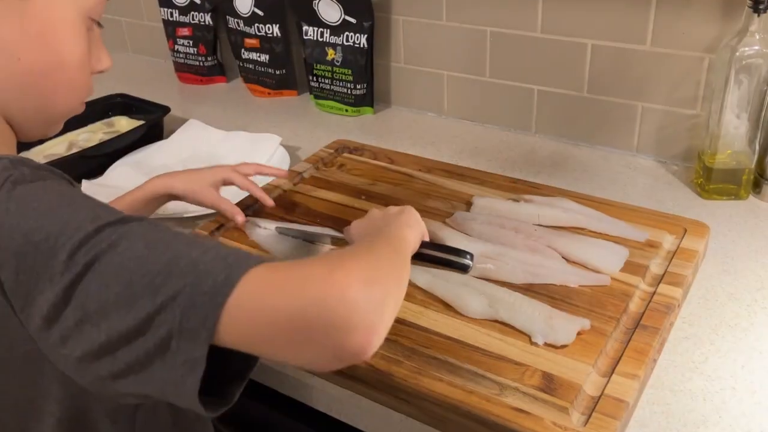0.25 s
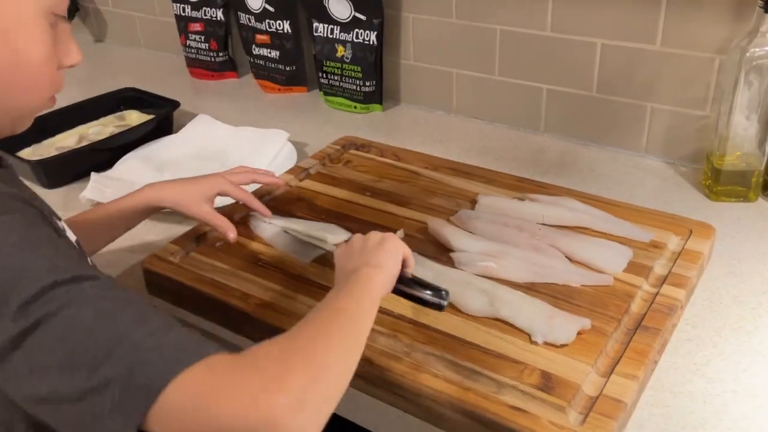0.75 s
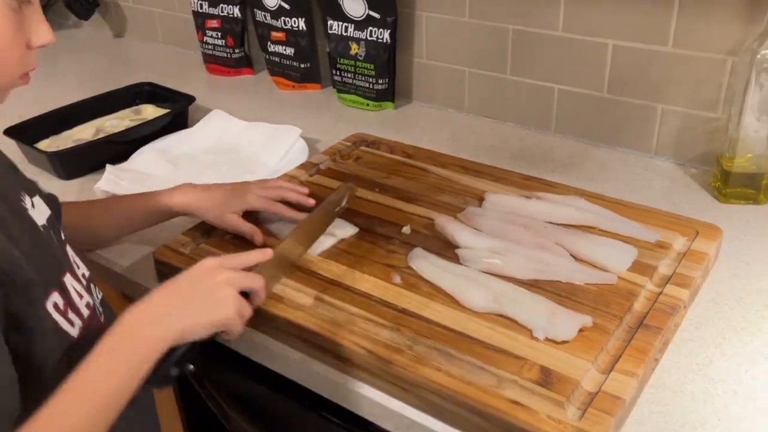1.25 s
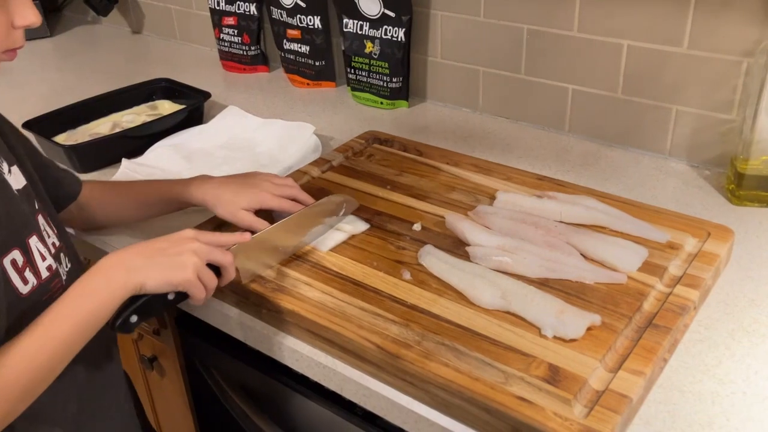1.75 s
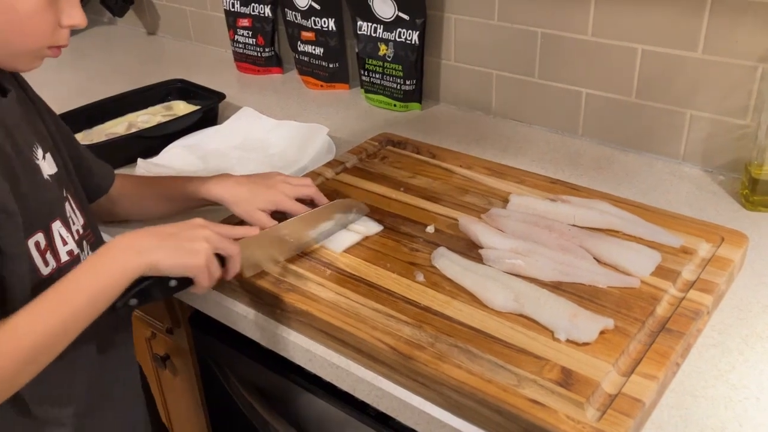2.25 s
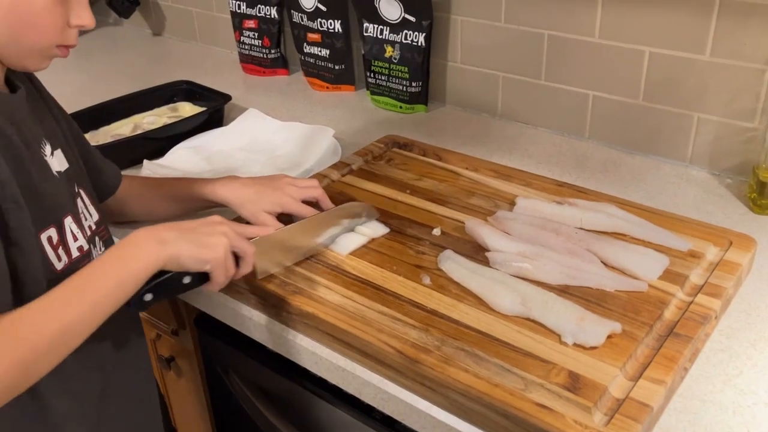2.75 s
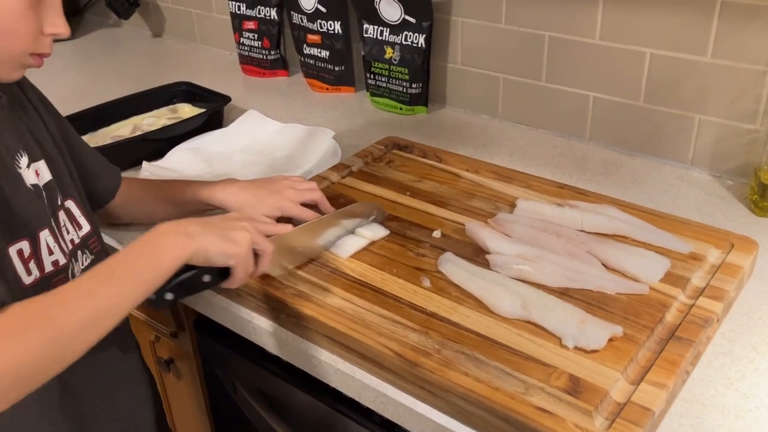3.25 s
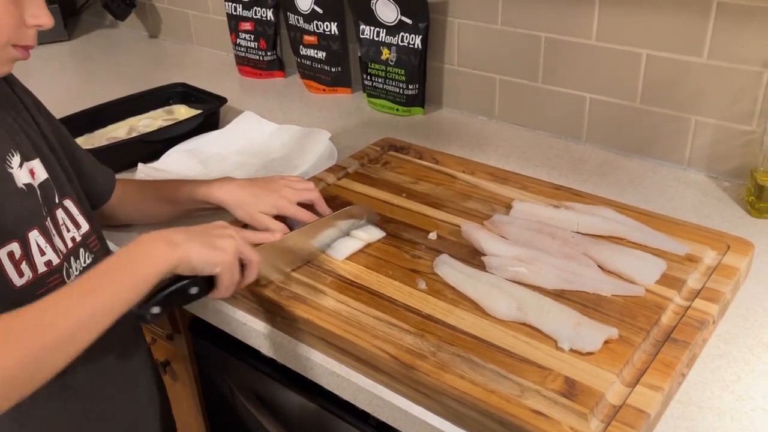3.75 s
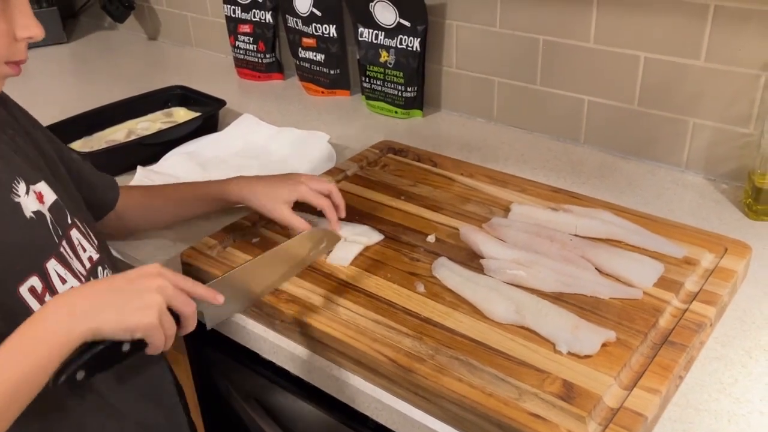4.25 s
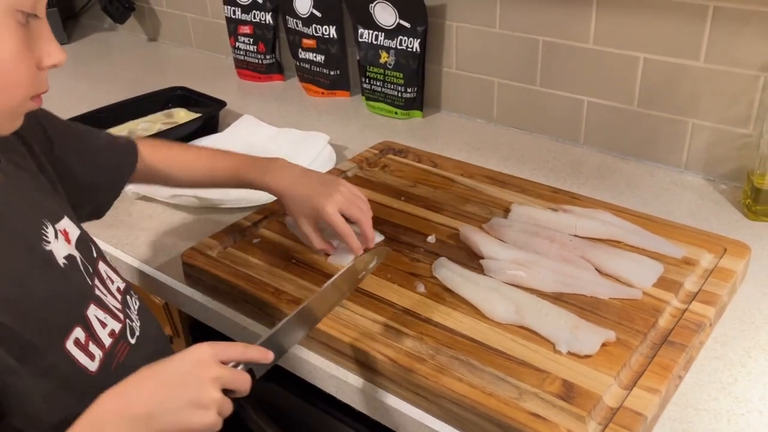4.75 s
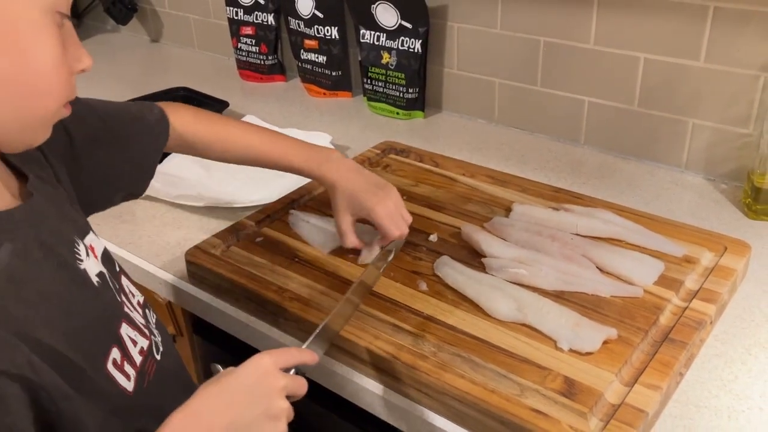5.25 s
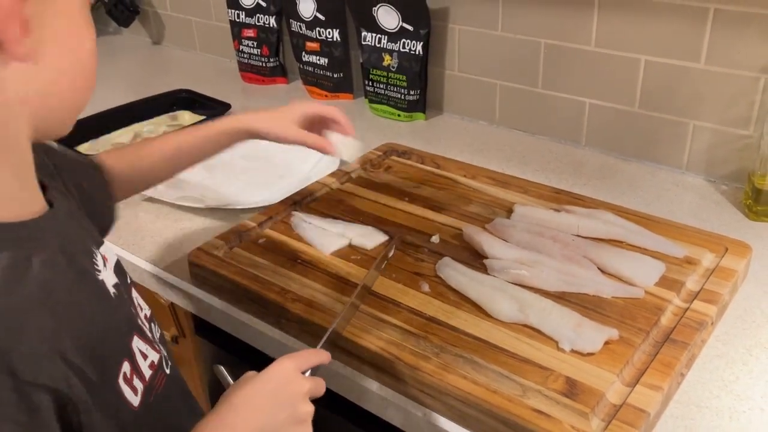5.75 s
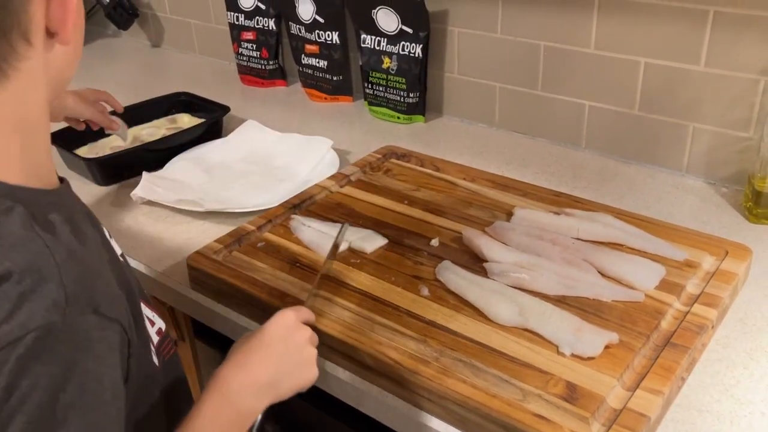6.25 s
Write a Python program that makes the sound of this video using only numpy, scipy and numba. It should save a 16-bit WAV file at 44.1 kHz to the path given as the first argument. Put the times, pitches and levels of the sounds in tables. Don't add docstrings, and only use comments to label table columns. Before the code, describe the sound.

Short faint blade rasps, then a denser run of scraping cuts, blade taps and a tiny wet peel, above a low muffled engine drone.

```python
import sys
import numpy as np
from scipy import signal
from scipy.fft import rfft, irfft
from scipy.io import wavfile
from scipy.ndimage import uniform_filter1d
from numba import njit

SR = 44100
rng = np.random.default_rng(int(sys.argv[2]) if len(sys.argv) > 2 else 0)


def volts(x):
    e = np.asarray(x, float) / 20
    return 10 ** e


def master(y):
    cut = np.clip(np.atleast_2d(y).T, -1, 1)
    pcm = np.round(cut * 32767)
    wavfile.write(sys.argv[1], SR, pcm.astype(np.int16))


N = 287532
T = np.arange(N) / SR
JOIN_HZ = 6400


# start of full pressure, attack, hold and release in seconds, board level in dB.
STROKES = [(0, .05, 0.0067, 0.12, -69), (0.156, 0.18, 0.1, 0.067, -74.5), (0.412, .09, 0.068, 0.12, -78.5),
           (0.701, 0.15, 0.056, 0.11, -72), (0.9, 0.06, 0.048, 0.17, -67), (1.108, 0.11, .11, 0.077, -77.5),
           (1.606, 0.22, 0.066, 0.18, -83), (2.403, 0.11, 0.077, 0.11, -81),
           (2.667, 0.081, 0.021, 0.1, -80.5), (2.902, 0.13, 0.019, 0.12, -63.5),
           (3.115, 0.085, 0.045, 0.12, -64.5), (3.29, 0.094, 0.099, 0.11, -63),
           (3.498, 0.028, .14, 0.11, -64.5), (3.711, 0.016, .08, .15, -66),
           (3.84, 0.22, 0.045, 0.12, -61.5), (4.047, 0.11, 0.12, 0.12, -66.5),
           (4.154, .06, 0.041, 0.096, -70), (4.331, .001, 0.017, 0.11, -69.5),
           (6.489, 0.0093, 0.036, .05, -84.5)]
# share of free ringing (0-1), bending of the blade's notes in percent,
# board thud and blade level in dB over the board, blade tilt in dB per band.
GRIPS = [(0.54, 1, 18.5, -0.5, -8), (0.58, 2.5, 14.5, 5.5, -4), (0.52, 3, 22.5, 5.5, -2.5),
         (0.86, 1.5, 12.5, 5, -4.5), (0.51, 2, 4, 4, -9), (0.24, 3, 13.5, 4.5, -8),
         (0.46, 3, 19, -11.5, 3.5), (0.57, -3, 7, -17, 2), (0.76, 0, 17.5, 8, -8.5),
         (0.35, -2.5, 4.5, 1.5, -6.5), (0.33, 0.4, 5.5, 3, -7), (0.25, -1.6, -0.5, 0.5, -3.5),
         (0.21, 0.5, 0.5, 3.5, -3.5), (0.14, -2, -2.5, 5, -7.5), (0.2, -0.1, 4, 0, -4),
         (0.11, -1.3, -1.5, 5.5, -3), (0.26, -0.5, 0, 7, -4.5), (0.042, -6.5, -16, 13.5, -13),
         (0.044, -9.5, -21, 9, -6.5)]
KNIFE_BANDS_HZ = [690, 2400, 6600, 11400, 13600, 19000]
# frequency in Hz, likeness (-1 to 1).
KNIFE_ALIKE = [(300, 0.91), (1100, 0.44), (1700, -0.43), (2400, 0.14), (2750, -0.66), (3100, 0.0042),
               (3700, 0.13), (5100, -0.37), (6300, -0.54)]


def knife():
    pressure_db = [db + swell(*shape, edge_db=22, curve=1.074) for *shape, db in STROKES]
    board_db, free, bend, thud_db, blade_db, tilt_db = loudest(pressure_db, np.transpose(GRIPS))
    free = np.clip(free, .05, .95)
    fibres_db = 1.33 * np.repeat(rng.exponential(size=N // 24 + 1), 24)[:N]
    catches = volts(fibres_db + 1.94 * walk(45))
    slips = unit(rng.standard_normal((2, N)) * catches)
    rasp = unit(rng.standard_normal((2, N)) * catches)

    ringing = blade_ring(slips, bend)
    damped = flesh_hiss(rasp)
    band_db = (0,
               blade_db - 3.0,
               blade_db + tilt_db + 5.5,
               blade_db + 2 * tilt_db + 0.5,
               blade_db + 1.8 * tilt_db + 4.5 - 6 * free)
    out = volts(thud_db) * board_thud()
    for low_hz, high_hz, db in zip(KNIFE_BANDS_HZ, KNIFE_BANDS_HZ[1:], band_db):
        ringing_part = np.sqrt(free) * unit(band(ringing, low_hz, high_hz))
        damped_part = np.sqrt(1 - free) * unit(band(damped, low_hz, high_hz))
        out = out + volts(db) * (ringing_part + damped_part)

    low_db, high_db = bites()
    out = volts(low_db) * band(out, 1, JOIN_HZ) + volts(high_db) * band(out, JOIN_HZ, 21000)
    out = out * volts(board_db) + singing(slips)
    return spread(out, KNIFE_ALIKE) * volts(np.array([[.5], [-.5]]))


# frequency in Hz, width in Hz, level in dB.
BLADE = [(1040, 45, -1), (2080, 580, -3), (2543, 76, -3.5), (3320, 300, 6), (3940, 160, 2.5),
         (4470, 330, 1.5), (5150, 31, -8), (6180, 90, 1), (7380, 40, -0.5), (8480, 330, 9.5),
         (6900, 300, -1.5), (10450, 110, 2), (10030, 970, 4), (11500, 73, 1.5), (12290, 230, 3),
         (2800, 280, -3.5), (13600, 440, 4), (14600, 180, 0), (15100, 770, 6)]


def blade_ring(slips, bend):
    struck = 0
    for k, (hz, width, db) in enumerate(BLADE):
        level = (-1) ** k * volts(db + 2 * walk(18)) / np.sqrt(width)
        struck = struck + level * ring(slips, hz * (1 + bend / 100), width)
    return sum(ring(struck, hz * (1 + bend / 100), 3 * width) for hz, width, _ in BLADE)


def flesh_hiss(rasp):
    out = .4 * rasp
    for hz in np.arange(750, 16300, 380.):
        out = out + volts(5.5 * walk(24) - 6) * ring(rasp, hz + 90 * rng.standard_normal(), 170)
    return out


# frequency in Hz, width in Hz, level in dB.
BOARD = [(162.7, 15.3, 1), (279, 11, -2), (358, 43, -2), (528, 33, -11.5)]


def board_thud():
    return unit(sum(volts(db) * ring(rng.standard_normal((2, N)), hz, width) for hz, width, db in BOARD))


# middle in seconds, level in dB, frequency in
# Hz, length in seconds.
SINGS = [(0.218, -76, 1080, 0.054), (0.447, -77.5, 3940, 0.17), (0.751, -68, 3620, 0.11),
         (0.938, -65.5, 11500, 0.09), (0.955, -69, 4270, 0.1), (0.959, -67.5, 7080, 0.069),
         (0.972, -76, 2500, 0.027), (2.392, -77, 1204, 0.083), (2.466, -84, 3480, .06),
         (2.847, -74, 3520, 0.049), (3.088, -70, 3670, 0.041), (4.026, -72.5, 3480, 0.064),
         (2.912, -59.5, 8240, 0.035), (3.143, -68.5, 1040, 0.059), (3.288, -64.5, 2880, 0.053),
         (3.345, -64, 1034, 0.058), (3.539, -61, 1040, 0.071), (3.57, -65, 1950, 0.063),
         (3.72, -67, 4700, 0.03), (3.872, -56, 8400, 0.04), (3.865, -57, 12900, 0.049),
         (4.063, -57.5, 11540, 0.029), (4.073, -65.5, 4270, 0.033), (4.197, -69, 9910, .045),
         (4.174, -69, 14700, .05), (4.2, -66, 6300, 0.086), (4.198, -65, 7320, 0.049),
         (4.218, -68, 8300, 0.052), (4.387, -72, 4950, 0.1), (4.37, -76, 5560, .05),
         (4.367, -79, 10700, .06), (4.385, -76, 3800, 0.075), (3.02, -82, 10700, .1),
         (3.45, -84, 10700, .12), (4.238, -75, 10700, .1), (4.1, -72, 3450, .12), (4.2, -67, 10000, .07),
         (0.212, -74, 4300, 0.087), (.2, -85, 7390, .12), (0.427, -73, 6370, 0.11),
         (3.346, -64.5, 900, .08), (3.83, -65.5, 940, 0.14), (3.143, -77, 1960, .05),
         (4.098, -78, 4000, .1),
         (0.139, -75, 9130, 0.05), (0.418, -76, 4010, 0.05), (0.726, -72, 10680, 0.05),
          (0.749, -78, 2760, 0.05), (0.896, -68, 10720, 0.05), (0.913, -73, 11800, 0.05),
          (0.92, -82, 3270, 0.045), (0.943, -68, 9910, 0.05), (0.942, -71, 1290, 0.065),
          (0.94, -76, 6120, 0.05), (0.958, -72, 3960, 0.04), (0.958, -65.5, 8480, 0.05),
          (0.958, -78, 1940, 0.05), (0.964, -73, 2630, 0.042), (3.143, -74, 3960, 0.05),
          (3.155, -71, 8480, 0.056), (3.338, -71, 14040, 0.05), (3.344, -61, 7970, 0.042),
          (3.349, -73, 11890, 0.054), (3.512, -70, 10030, 0.046), (3.535, -70, 14170, 0.05),
          (3.558, -65, 15630, 0.054), (3.57, -73, 8350, 0.05), (3.582, -65, 2890, 0.065),
          (3.582, -74, 3960, 0.055), (3.587, -66, 12700, 0.05), (3.599, -66, 9560, 0.05),
          (3.606, -64.5, 1460, 0.05), (3.628, -70, 10380, 0.05), (3.638, -66, 10080, 0.05),
          (3.86, -62, 8790, 0.05), (3.866, -68, 10900, 0.05), (3.866, -60, 15630, 0.05),
          (3.884, -73, 2070, 0.056), (4.043, -65, 8350, 0.05), (4.058, -71, 10030, 0.05),
          (4.058, -69, 11460, 0.05), (4.081, -65, 14080, 0.05), (4.145, -64, 6120, 0.045),
          (4.158, -71, 11840, 0.059), (4.185, -71, 14080, 0.05), (4.191, -68, 13520, 0.05),
          (4.197, -66, 7280, 0.043), (4.218, -67, 8480, 0.05)]


def singing(slips):
    out = 0
    for s, db, hz, length in SINGS:
        shape = np.exp(-((T - s) / length * 2) ** 2)
        tone = ring(slips, hz, width=65)
        loudness = np.sqrt(np.average(np.mean(tone ** 2, axis=0), weights=shape ** 2))
        out = out + volts(db + 2.0) * shape * tone / loudness
    return out


# start in seconds, jump in dB below and above the join
# frequency, settling time in seconds.
BITES = [(2.886, 4, 6, 0.039), (3.075, 0.5, 7.5, .03), (3.102, 1.5, 6, 0.049), (3.27, 1, -0.5, .04),
         (3.326, 5, 8, 0.039), (3.49, -0.5, -1, .03), (3.525, 1.5, 1.5, 0.025), (3.55, 4, 2.5, 0.046),
         (3.704, 1.5, -6, 0.047), (3.76, 1, 8, 0.054), (3.851, 2, 5, 0.035), (4.014, 1, 0.5, .08),
         (4.104, -9, -10, 0.02), (4.158, -7, -5, .01), (4.171, 0.5, 5.5, .06), (.9, 1, 3, 0.028),
         (.7, 0, -1.5, .04)]


def bites():
    start, low_db, high_db, settle = np.transpose(BITES)
    since = np.maximum(T - start[:, None], 0)
    shape = np.minimum(since / 0.0018, 1) * np.exp(-since / np.maximum(settle[:, None], .004))
    return np.array([low_db, high_db]) @ shape


# start in seconds, peak in dB, frequency in Hz,
# time to ring down by 60 dB in seconds.
TICKS = [(0.0114, -60.5, 3240, 0.028), (0.0433, -65, 3240, 0.035), (0.0767, -67.5, 3240, 0.024),
         (3.7044, -56, 4687, 0.0023), (4.174, -50, 11790, 0.003), (4.19, -58, 10500, 0.003),
         (4.3328, -49, 7140, 0.004), (4.3328, -54, 3500, 0.0025), (4.338, -54, 7100, 0.006),
         (4.3487, -53, 5626, 0.0045), (4.5361, -73, 10450, 0.0032), (4.5884, -74, 4060, 0.003),
         (6.4901, -70, 6873, 0.0034), (6.4944, -58.5, 7590, 0.0039)]
# start in seconds, peak in dB, frequency in Hz,
# time to ring down by 60 dB in seconds.
POPS = [(5.0121, -46, 14800, .002), (5.0144, -60, 15000, .002), (5.0176, -49, 11300, .0025),
        (5.02, -51, 10800, .002), (5.0213, -56, 12200, .002), (5.0233, -60, 11500, .004),
        (5.0574, -54, 12000, .003), (5.0608, -57, 11900, .002), (5.0692, -60, 8200, .003),
        (5.0715, -69, 4800, .004), (5.0693, -51, 12500, .002), (5.0715, -54, 7500, .003)]
# start in seconds, peak in dB, frequency in Hz,
# time to ring down by 60 dB in seconds.
KNOCKS = [(1.405, -61, 551, 0.031), (1.718, -69, 611, 0.03), (4.588, -79, 554, 0.027),
          (0.02, -59.5, 330, 0.093), (0.375, -45, 330, 0.091), (0.408, -48, 385, 0.062),
          (0.705, -46, 345, 0.08), (0.514, -46.5, 210.5, 0.12), (1.02, -54, 218, 0.096),
          (1.08, -58, 330, .1), (1.085, -67, 537, 0.11), (1.226, -57, 243, 0.079),
          (2.237, -45.5, 221, 0.13), (4.902, -60, 194, 0.11), (5.671, -51, 178, 0.087),
          (5.949, -50.5, 209.4, 0.24), (6.198, -49, 230, 0.16)]


def ticks_and_knocks():
    out, t = np.zeros(N + 8192), np.arange(8192) / SR
    for s, db, hz, t60 in TICKS + POPS + KNOCKS:
        fade = np.exp(-np.log(1000) * t / t60) * np.minimum(t / (0.1 * t60), 1)
        noise = uniform_filter1d(rng.standard_normal(len(t)), size=5)
        snap = 0.5 * noise * (hz > 4000) * np.exp(-t / 0.00046)
        out[int(s * SR):][:len(t)] += volts(db + 7) * (fade + snap) * np.sin(2 * np.pi * hz * t)
    return out[:N]


# start and release in seconds, level in dB, frequency and width in Hz.
PEEL = [
    (5.018, 0.11, -72, 11500, 6060),
    (5.072, 0.097, -74, 7900, 2500),
]


def peeling():
    crackle = rng.standard_normal(N) * volts(1.5 * rng.exponential(size=N))
    out = 0
    for s, fall, db, hz, width in PEEL:
        level = volts(db + swell(s, 0.0044, 0, fall, edge_db=11.8, curve=0.5))
        out = out + level * unit(ring(ring(crackle, hz, width), hz, width))
    return out


def near_tiles(hits):
    tail = rng.standard_normal((2, 4096)) * np.exp(-np.arange(4096) / SR / 0.0033)
    return hits + volts(-30.5) * signal.fftconvolve(hits[None], tail)[:, :N]


# time in seconds, firing frequency in Hz.
ENGINE = [(0, 45.8), (.29, 57.97), (.6, 63.9), (1.0, 71.4), (1.54, 77.17), (2.2, 85.47), (3.0, 96.6),
          (3.6, 104.3), (4.2, 108.6), (4.57, 104.4), (4.96, 102.8), (5.39, 95.5), (5.8, 89.6),
          (6.21, 87.25), (6.52, 66.8)]
# loudest moment, swell and fade in seconds, level in dB,
# left minus right in dB.
SWELLS = [(.3, .45, 0.2, -43.5, -1.5), (.42, .15, 0.053, -46.5, -1.5), (.58, 0.069, 0.076, -53.5, -1),
          (.89, 0.26, 0.2, -44, -0.5), (1.1, .15, .09, -50.5, -2.5), (1.22, .05, .2, -51.5, 2),
          (1.58, 0.42, 0.44, -44, -1), (1.74, .15, .09, -46.5, -5), (1.93, 0.14, 0.33, -51, -5),
          (2.3, 0.087, 0.42, -49, 2.5), (2.48, 0.18, 0.22, -49.5, 3.5), (2.69, 0.18, 0.19, -45, 0),
          (2.99, 0.21, 0.29, -44, -1), (3.3, 0.64, 0.13, -44.5, -1), (3.78, 0.17, 0.23, -53, -1),
          (4.07, 0.19, 0.28, -48.5, -1), (4.55, 0.24, 0.33, -48, -1), (4.76, 0.19, 0.28, -47, -1.5),
          (4.94, .15, .1, -50, -4.5), (5.12, 0.17, 0.26, -47.5, -3.5), (5.41, 0.22, .45, -46.5, -1.5),
          (5.65, .2, 0.19, -51.5, -1), (5.98, .1, 0.18, -60.5, 0.5), (6.41, 0.15, 0.18, -55, -1.5)]
CANCELS = [(.63, 0.018), (1.175, 0.018), (1.818, 0.051), (2.228, 0.025), (2.578, 0.017), (4.33, 0.036),
           (5.033, 0.052), (5.788, 0.058)]
# middle and swell in seconds, level in dB.
DOUBLE = [
    (.15, 0.39, -59.5),
    (3, 0.26, -58.5),
    (4.6, 2.1, -64.5),
]


def engine():
    hz = np.interp(T, *np.transpose(ENGINE))
    paths_db = [db + swell(s, rise, 0, fall, edge_db=15, curve=1.69) for s, rise, fall, db, _ in SWELLS]
    db, pan_db = loudest(paths_db, [np.transpose(SWELLS)[-1]])
    phase = 2 * np.pi * np.cumsum(hz * (1 + 0.01163 * walk(14))) / SR
    firing = volts(db + 1.0 * walk(18)) * np.sin(phase)
    double = volts(passing(DOUBLE) + 5.2 * walk(9)) * np.sin(2 * phase)
    tone = firing + double
    for s, length in CANCELS:
        tone = tone * (1 - 0.59 * np.exp(-((T - s) / length) ** 2))
    return np.sqrt(2) * tone * volts(np.array([pan_db, -pan_db]) / 2)


# middle and swell in seconds, level in dB.
TRAFFIC = [(1.4, 1, -58), (2.16, 0.15, -52.5), (3.1, 0.56, -54.5), (4.25, 0.88, -58), (4.78, 0.3, -58),
           (5.4, 0.53, -58)]


def traffic():
    return volts(passing(TRAFFIC)) * unit(ring(ring(pair(0.93), 56.3, 22), 56.3, 22))


# frequency in Hz, level in dB per Hz.
ROOM = [(15, -40), (25, -5), (71, 1), (96, 9.5), (140, -9.5), (233, 2.5), (288, -12), (448, -11),
        (649, -33.5), (801, -18.5), (987, -31), (3310, -39.5), (6500, -46.5), (8450, -80), (14300, -120)]
# frequency in Hz, width in Hz, level in dB.
ROOM_MODES = [(104.7, 3.3, -71), (119.7, 2.7, -73), (169, 6.4, -69), (225.67, 4.4, -62),
              (247.6, 4.1, -69.5), (330, 8.2, -70.5), (889.6, 18, -86), (1040, 64, -99)]


def room_rumble():
    hz_points, db_points = np.transpose(ROOM)
    rumble, drift = 0, walk(0.8)
    for hz in 28 * 2 ** np.arange(0, 8, .5):
        db = np.interp(np.log(hz), np.log(hz_points), db_points) + .4 * drift + 2.2 * walk(9)
        rumble = rumble + volts(db) * ring(ring(pair(1.05 - hz / 900), hz, hz / 2), hz, hz / 2)
    out = unit(rumble) * volts(-57)
    for hz, width, db in ROOM_MODES:
        out = out + volts(db) * unit(ring(ring(pair(1.02 - hz / 1500), hz, width), hz, 4 * width))
    return out


def hiss():
    air = pair(0)
    return volts(-87) * (unit(band(air, 3850, 10000)) + volts(-0.5) * unit(band(air, 9350, 21000)))


# frequency in Hz, level in dB.
WHINE = [(7133, -102), (10697, -89.5), (14266, -106)]
# time in seconds, change in dB.
WHINE_FADE = [
    (0, 11),
    (2.2, 3),
    (2.9, -11),
    (4.4, -7),
    (5.2, -3),
]


def supply_whine():
    fade = volts(np.interp(T, *np.transpose(WHINE_FADE)) + 2.0 * walk(25))
    wobble = np.cumsum(0.0004 * walk(60)) / SR
    tones = sum(np.sqrt(2) * volts(db - 2.5) * np.sin(2 * np.pi * hz * (T + wobble)) for hz, db in WHINE)
    return fade * tones


def swell(s, attack, hold, release, edge_db, curve):
    before = np.maximum(s - T, 0) / np.maximum(attack, .001)
    after = np.maximum(T - s - hold, 0) / np.maximum(release, .002)
    return -edge_db * (before + after) ** curve


def loudest(levels_db, columns):
    top = np.argmax(levels_db, axis=0)
    level_db = np.maximum(np.max(levels_db, axis=0), -140)
    traits = [uniform_filter1d(np.array(c, float)[top], size=900) for c in columns]
    return level_db, *traits


def passing(rows):
    return loudest([db + swell(s, length, 0, length, 9.4, 1.2) for s, length, db in rows], [])[0]


def walk(rate):
    k = int(SR / rate)
    steps = np.repeat(rng.standard_normal(N // k + 1), k)
    return 1.275 * uniform_filter1d(uniform_filter1d(steps, k), k)[:N]


def unit(x):
    return x / np.sqrt(np.mean(x ** 2))


@njit
def moving_ring(x, hz, width):
    y, b, l = np.empty(len(x)), 0., 0.
    for i in range(len(x)):
        g, k = np.tan(np.pi * hz[i] / SR), width / hz[i]
        v = (b + g * (x[i] - l)) / (1 + g * (g + k))
        b, l, y[i] = 2 * v - b, l + 2 * g * v, k * v
    return y


def ring(x, hz, width):
    if np.ndim(hz):
        return np.array([moving_ring(c, hz, 1. * width) for c in x])
    return signal.lfilter(*signal.iirpeak(hz, hz / width, SR), x)


def band(x, low_hz, high_hz):
    hz = np.arange(N // 2 + 1) * SR / N

    def edge(at):
        return np.clip((hz / at - 1) * 4 + .5, 0, 1)

    return irfft(rfft(x) * (edge(low_hz) - edge(high_hz)), N)


def pair(alike):
    mid, side = rng.standard_normal((2, N))
    alike = np.clip(alike, 0, 1)
    return np.sqrt((1 + alike) / 2) * mid + np.sqrt((1 - alike) / 2) * side * np.array([[1], [-1]])


def spread(two, alike):
    hz, share = np.transpose(alike)
    c = np.interp(np.log(np.arange(1, N // 2 + 2) * SR / N), np.log(hz), share)
    c = np.clip(c, -1, 1)
    mid, side = rfft(two) * np.sqrt([(1 + c) / 2, (1 - c) / 2])
    return irfft(np.array([mid + side, mid - side]), N)


def scene():
    hits = near_tiles(ticks_and_knocks() + peeling())
    return knife() + hits + engine() + traffic() + room_rumble() + hiss() + supply_whine()


def band_limit(x):
    return signal.sosfilt(signal.butter(12, 16520, fs=SR, output="sos"), x)


def record(dry):
    hz = np.arange(N // 2 + 1) * SR / N
    bass_cut = np.sqrt(1 + (46 / (hz + 1)) ** 8)
    top_cut = np.sqrt(1 + (hz / 15790) ** 1200)
    left, right = rfft(dry) / bass_cut / top_cut
    joined = np.clip((hz - JOIN_HZ) / 900 + .5, 0, 1) * .97
    own = left * np.exp(1j * .25)
    late = right * np.exp(-2j * np.pi * hz * .00022)
    left = np.sqrt(1 - joined) * own - np.sqrt(joined) * late
    mix = irfft(np.array([left, right]), N)
    return band_limit(mix)


dry = scene()
out = record(dry)
master(out)
```